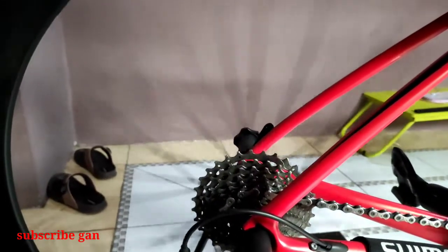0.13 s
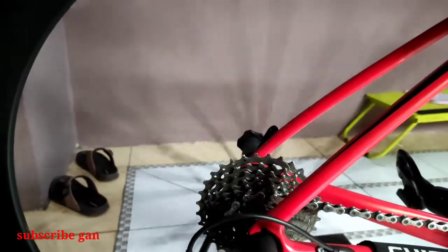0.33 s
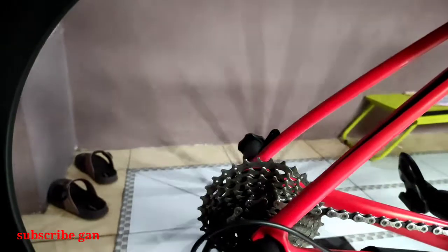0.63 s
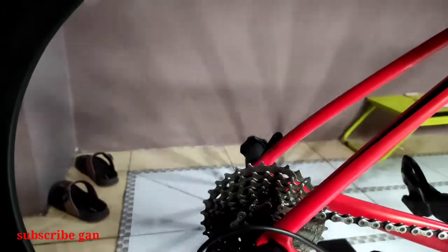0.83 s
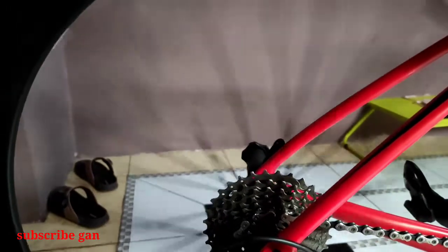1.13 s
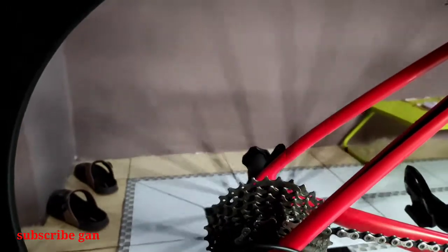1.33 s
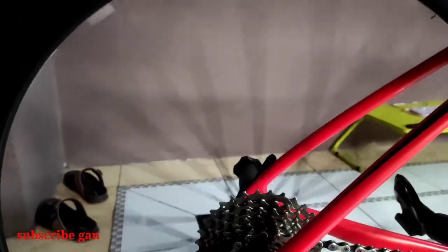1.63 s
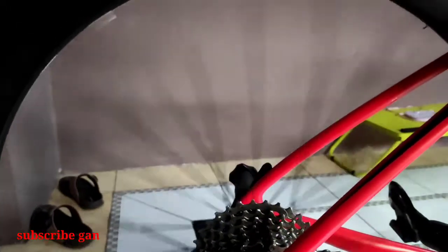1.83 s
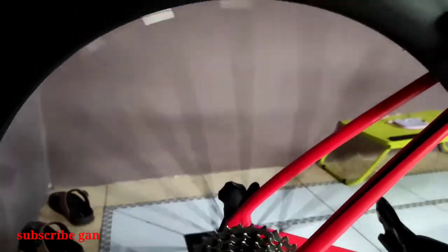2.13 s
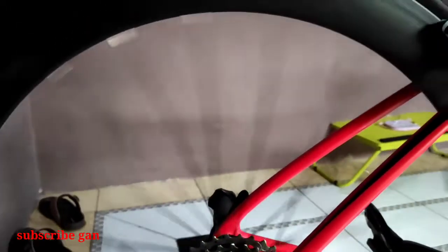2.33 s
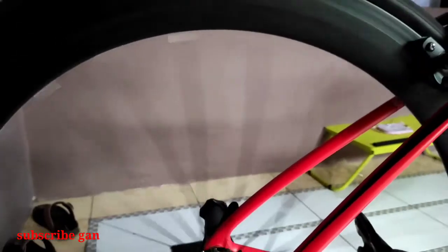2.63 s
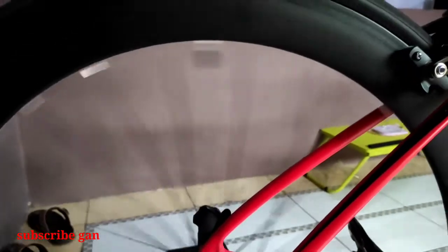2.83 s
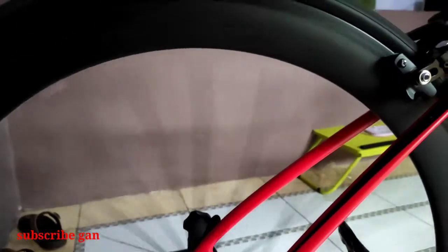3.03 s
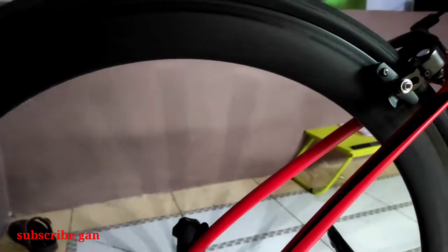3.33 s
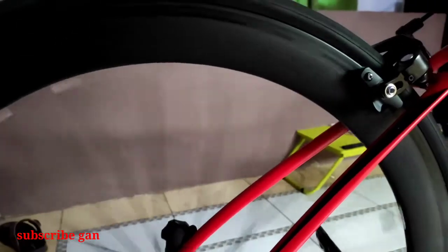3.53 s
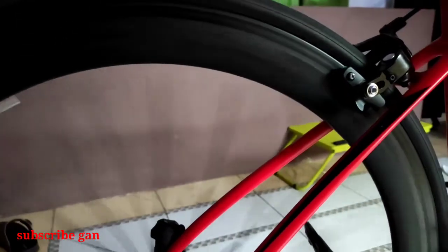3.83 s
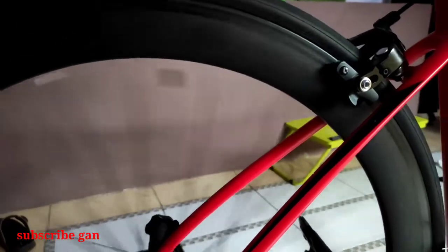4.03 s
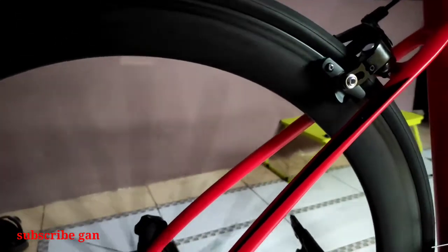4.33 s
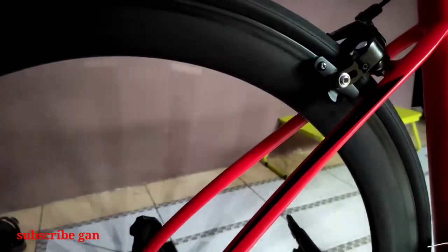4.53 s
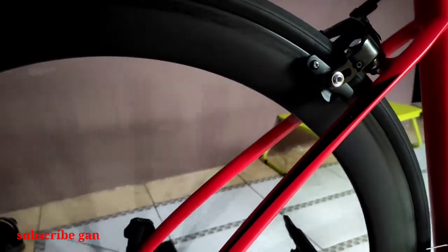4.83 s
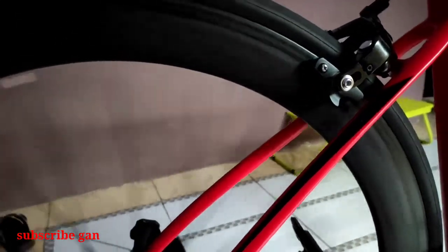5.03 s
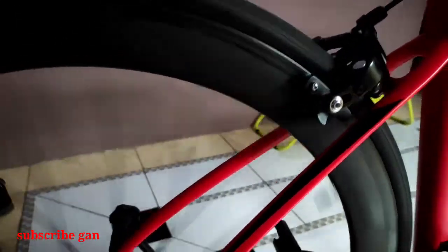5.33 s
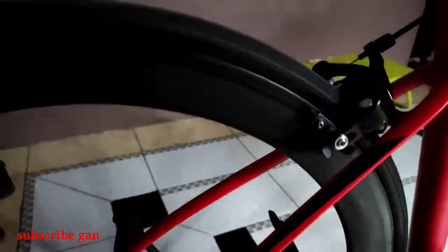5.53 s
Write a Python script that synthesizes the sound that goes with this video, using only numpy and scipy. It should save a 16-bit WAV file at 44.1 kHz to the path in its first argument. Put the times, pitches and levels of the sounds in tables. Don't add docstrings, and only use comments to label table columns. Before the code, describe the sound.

A bicycle's rear freehub clicks in a fast, loud, bright metallic ratchet buzz, slowing slightly as the wheel coasts in a tiled room.

```python
import sys
import numpy as np
from scipy import signal
from scipy.fft import rfft, irfft
from scipy.io import wavfile
from scipy.ndimage import uniform_filter1d

SR = 44100
rng = np.random.default_rng(int(sys.argv[2]) if len(sys.argv) > 2 else 0)


def persist_wave(psi):
    counts = np.round(np.clip(psi, -1, 1) * 32767).astype(np.int16)
    wavfile.write(sys.argv[1], SR, np.atleast_2d(counts).T)


def ratio(d):
    e = np.asarray(d, float) / 20
    return 10 ** e


N = 250091
LEAD = 4410
TEETH_PER_TURN = 24
LEFT_RIGHT_HALVES = np.array([[.5], [-.5]])

# low edge in Hz, high edge in Hz, snap t60 in s,
# rattle level in dB, rattle t60 in s, room level in dB, room t60 in s.
WHEEL_PARTS = [
    (1050, 3070, 0.0039, -10, 0.1, -27, 1),
    (2530, 3800, 0.009, -13.5, 0.21, -18, 0.33),
    (3090, 6220, 0.0048, -8.5, 0.078, -21.5, 0.46),
    (5460, 11160, 0.0052, -10.5, 0.029, -22, 0.46),
    (11400, 20100, 0.0062, -11, 0.071, -28, 0.12),
]


def rms_one(x):
    return x / np.sqrt(np.mean(x ** 2) + 1e-20)


def in_time(rows):
    s, *columns = np.transpose(rows)
    return [np.interp(np.arange(N) / SR, s, column) for column in columns]


def band(x, low_hz, high_hz):
    return signal.sosfilt(signal.butter(2, [low_hz, high_hz], "band", fs=SR, output="sos"), x)


def colour(x, hz, level_db):
    size = 8192
    grid_hz = np.maximum(np.arange(size // 2 + 1) * SR / size, 1)
    log_gain = np.interp(np.log(grid_hz), np.log(hz), level_db) * np.log(10) / 20
    cepstrum = irfft(log_gain)
    cepstrum[1:size // 2] *= 2
    cepstrum[size // 2 + 1:] = 0
    response = irfft(np.exp(rfft(cepstrum)))
    return signal.fftconvolve(x, response)[:N]


def dying(x, t60):
    return signal.lfilter([1], [1, -ratio(-60 / (t60 * SR))], x + 1e-18)


def impulses(s, sizes):
    at = np.clip(np.round(np.ravel(s) * SR).astype(int) + LEAD, 0, N + LEAD - 1)
    return np.bincount(at, np.ravel(sizes), N + LEAD)


def wide(mid, side, side_db, left_db):
    return (mid + ratio(side_db) * side * [[1], [-1]]) * ratio(left_db * LEFT_RIGHT_HALVES)


def teeth():
    # strength in dB, lateness in ms.
    ring = [(0.2, 0.12), (0, 0.44), (0.2, 0.31), (-3.3, 0.5), (-0.1, -0.019), (-2, 0.0054), (-1.1, 0.34),
            (-0.9, -0.18), (-1.2, 0.059), (-1.6, -0.16), (-1.5, -0.5), (-1.64, 0.04), (-0.15, -0.098),
            (-0.9, -0.19), (-3, -0.5), (-1.2, -0.8), (0.34, -0.15), (-0.3, -0.69), (-2.3, -0.46),
            (0, -0.14), (-2, 0.064), (-1.25, 0.52), (-0.26, 0.42), (0.1, -0.46)]
    # time in seconds, extra level in dB, lateness in ms.
    odd_teeth = [(0.032, -4, -2), (0.197, 2.2, 1), (0.221, 9, 0.2), (0.268, 0.5, -0.5), (0.386, -2.3, 1),
                 (0.6, -1, 1.2), (0.743, -1, 0.5), (0.886, -4, -1), (1.173, 1.2, 4), (1.197, 9, 10),
                 (1.221, 18, 9), (1.245, 0.5, -1.8), (1.317, -0.5, 1.8), (1.437, 6, 6), (1.558, -1, 0),
                 (1.824, -0.5, 0.2), (1.848, 0.2, 0.5), (1.872, -1.5, -1.3), (1.97, 2.8, -0.5),
                 (1.994, 1, -0.5), (2.115, 0, 3), (2.164, 3, 0), (2.678, 3, 3), (2.825, -1, -0.2),
                 (3.047, -0.5, -0.5), (3.494, 2, -0.2), (4.75, 2.5, 1), (4.801, 0.5, 0.6), (4.979, 1.5, 3),
                 (5.517, -1.6, 0.2)]
    # time in seconds, peak level in dB.
    slams = [(0.2194, -7), (0.6469, -7), (0.9083, -5), (1.0774, -6.5), (1.1009, -5.5), (1.1488, -3),
             (1.1962, -7), (1.2206, -6.5), (1.3882, -5.5), (1.4361, -4.5), (1.727, -2.5), (1.7509, -7.5),
             (2.0173, -2.5), (2.0657, -6.5), (2.2608, -7), (2.6279, -6), (2.8494, -8), (3.022, -8.5),
             (3.1951, -6.5), (3.2191, -8), (3.4186, -3.5), (3.6671, -7), (3.8417, -7.5), (4.0178, -6.5),
             (4.6488, -5.5), (5.2335, -7.5)]
    first_tooth_s = .0083
    gap_s, gap_growth_s, growth_gain_s = .0235557, 8.538e-6, 9.39e-9
    tooth_level_db, fade_db_per_s, swing = -9.8, -0.27, 1.02
    scatter_db, jitter_ms = 0.33, 0.22
    slam_db, slam_spread, slam_early_ms = 6.5, .5, 0.35

    k = np.arange(-3, 231)
    s = first_tooth_s + gap_s * k + gap_growth_s * k ** 2 / 2 + growth_gain_s * k ** 3 / 6
    extra_db, late_ms = np.array(ring)[np.arange(len(k)) % TEETH_PER_TURN].T
    stray = rng.standard_normal((len(k), 2)) * [scatter_db, jitter_ms]
    spread = np.ones(len(k))
    for at, odd_db, odd_ms in odd_teeth:
        stray[np.argmin(np.abs(s - at))] = odd_db, odd_ms
    s = s + (late_ms + stray[:, 1]) / 1000
    for at, peak_db in slams:
        near = np.argmin(np.abs(s - at))
        s[near] = at - slam_early_ms / 1000
        stray[near, 0] = peak_db + slam_db
        spread[near] = slam_spread
    tooth_db = tooth_level_db + fade_db_per_s * s + swing * (extra_db + stray[:, 0])
    return s, tooth_db, spread


def pawls(s, tooth_db, spread, scatter_db, part_db):
    # lag as a share of the spread, lag scatter as a share of the spread, level in dB.
    pawl_rows = [
        (-.3, 0.081, 0),
        (.1, 0.084, -5.5),
        (0.449, .15, 1.5),
        (.8, 0.21, -2),
        (1.8, 0.47, -10.5),
        (3.5, 1.5, -10),
    ]
    lag, lag_scatter, pawl_db = np.transpose(pawl_rows)
    looseness_db = rng.standard_normal(len(s)) - 0.85 * (tooth_db - tooth_db.mean())
    spread_ms = spread * 2.2 * ratio(np.minimum(looseness_db, 1.2))

    streams = 2 * len(WHEEL_PARTS)
    chance = rng.standard_normal((len(s), 2 + streams, len(lag)))
    when = s[:, None] + spread_ms[:, None] / 1000 * (lag + lag_scatter * chance[:, 0])
    energy = ratio(pawl_db + scatter_db * chance[:, 1]) ** 2
    energy = energy / energy.sum(axis=1, keepdims=True) * ratio(tooth_db[:, None]) ** 2
    blows = [impulses(when, energy * ratio(part_db * chance[:, 2 + k]) ** 2) for k in range(streams)]
    return np.reshape(blows, (len(WHEEL_PARTS), 2, -1))


def hub(s, tooth_db, spread, rim_db, tail_db):
    out = 0
    white = rng.choice([-1., 1.], (2, 2, N))
    tail_power = np.pad(ratio(2 * tail_db), (LEAD, 0), "edge")
    part_blows = pawls(s, tooth_db, spread, scatter_db=5.0, part_db=1.9)
    for k, (blows, part) in enumerate(zip(part_blows, WHEEL_PARTS)):
        low_hz, high_hz, snap_t60, rattle_db, rattle_t60, room_db, room_t60 = part
        late = dying(blows, 0.0072) / 40 * tail_power
        snap = dying(uniform_filter1d(blows, size=30), snap_t60 / 2)
        rattle = ratio(2 * rattle_db) * dying(late, rattle_t60 / 2)
        room = ratio(2 * room_db) * dying(late, room_t60 / 2)
        power = snap + rattle + room
        sound = band(np.sqrt(power[:, LEAD:]) * white[k % 2], low_hz, high_hz)
        out = out + ratio(rim_db * (k == 0)) * sound
    return out


def turned(x, s):
    patch_db, broad_kept = 4, 0.62
    hz, t, z = signal.stft(x, SR, nperseg=256)
    tooth = np.searchsorted(s - .003, t)
    fine = uniform_filter1d(rng.standard_normal((len(s) + 1, 3, len(hz))), size=2)
    fine = fine - (1 - broad_kept) * uniform_filter1d(fine, size=11)
    shared, left, right = fine.T.swapaxes(0, 1)
    depth_db = patch_db * np.clip(hz / 4000, .7, 1)[:, None]
    patch = ratio(depth_db * np.array([shared + left, shared + right]))
    usual = np.mean(np.abs(z) ** 2, axis=2, keepdims=True)
    patched = uniform_filter1d(usual * patch ** 2, size=15, axis=1)
    patch = patch / np.sqrt(patched / uniform_filter1d(usual, size=15, axis=1))
    return signal.istft(z * patch[:, :, tooth], SR, nperseg=256)[1][:, :N]


def ratchet(s, tooth_db, spread):
    # left level in dB, right level in dB.
    port_colour = [(-75, -72), (-60.5, -57), (-50, -50.5), (-56.5, -56.5), (-46.5, -45), (-60.5, -55),
                   (-58.5, -61.5), (-55.5, -51), (-49, -36), (-36.5, -47), (-56.5, -55.5), (-53.5, -59.5),
                   (-51, -47), (-57.5, -55.5)]
    port_hz = [1300, 1900, 2800, 3380, 4100, 4750, 5800, 6900, 7750, 8700, 10300, 11600, 12250, 13600]
    # time in seconds, hub level in dB, left minus right in dB, lowest band of the rim in dB,
    # rattle and echoes in dB.
    drift = [
        (0, 0, -1, -1.5, 0),
        (1.0, 0.5, 0.5, -0.5, -1.3),
        (2, 0, 0.5, -1.5, -1.05),
        (3, 0.5, 2, 0.5, -0.6),
        (4.5, 1, 2, 1, -0.4),
        (5.67, 2, 0.2, -0.4, 0.1),
    ]
    left_db, right_db = np.transpose(port_colour)
    level_db, lean_db, rim_db, tail_db = in_time(drift)
    left, right = hub(s, tooth_db, spread, rim_db, tail_db)
    coloured = np.array([colour(left, port_hz, left_db), colour(right, port_hz, right_db)])
    return rms_one(turned(coloured, s)) * ratio(-19.5 + level_db + lean_db * LEFT_RIGHT_HALVES)


def spokes(s, level_db):
    # frequency in Hz, level in dB, t60 in s,
    # tooth of the turn where it changes, extra level there in dB.
    rings = [(729, -13.5, 0.16, 14, 5), (863, -7.5, 0.13, 22.2, 12.5), (911, -10, 0.34, 11.4, 2.5),
             (950, -4.5, 0.15, 16.3, -4), (1015, -13.5, 0.18, 0.99, 14), (1076, -9.5, 0.19, 46, -1),
             (1236, -10.5, 0.18, 3.3, 1), (1518, -6, 0.14, 10.2, 10.5), (1977, 3, 0.11, 5.4, 6)]
    out = 0
    place = np.arange(len(s)) % TEETH_PER_TURN
    for hz, mode_db, t60, tooth, extra_db in rings:
        r, w = ratio(-60 / (t60 * SR)), 2 * np.pi * hz / SR
        singing = ratio(extra_db * np.exp(-((place - tooth) / 1.44) ** 2))
        common, left, right = rng.standard_normal((len(s), 3)).T * singing
        plucks = np.array([impulses(s, 1.17 * common + left), impulses(s, 0.28 * common + right)])
        plucks = uniform_filter1d(plucks, size=12)
        ringing = signal.lfilter([0, np.sin(w)], [1, -2 * r * np.cos(w), r * r], plucks + 1e-18)
        out = out + ratio(mode_db + level_db) * ringing
    return out[:, LEAD:]


def swells(rows, idle_db):
    swell_s = .04
    start, length, *level_db = np.transpose(rows)
    t = np.arange(0, N + 100, 100)[:, None] / SR
    inside_s = np.minimum(t - start, start + length - t)
    shape = np.clip(inside_s / swell_s + .5, 0, 1) ** 2
    power = shape ** 2 @ ratio(2 * np.transpose(level_db)) + ratio(2 * np.array(idle_db))
    return [np.interp(np.arange(N) / SR, t[:, 0], np.sqrt(p)) for p in power.T]


def rumble(gains):
    # time in seconds, rate in Hz.
    firing = [
        (0, 80.8),
        (.5, 78.73),
        (1.05, 76.6),
        (1.65, 73.77),
        (2.35, 67.73),
        (2.9, 64.3),
        (3.5, 60.85),
        (3.9, 78.7),
        (5.67, 78.9),
    ]
    orders = [(1, 0), (2, 0), (3, 1), (4, 2), (5, 2)]
    order_levels = [-12.5, -1.5, -3, -2, -6]
    waver_hz = 3.5
    turns = np.cumsum(in_time(firing)[0]) / SR
    out, r = 0, np.exp(-np.pi * waver_hz / SR)
    for (multiple, column), level_db in zip(orders, order_levels):
        noise = rng.standard_normal((2, N + LEAD)) + 1j * rng.standard_normal((2, N + LEAD))
        waver = signal.lfilter([1], [1, -2 * r ** multiple, r ** (2 * multiple)], noise)[:, LEAD:]
        waver = waver / np.sqrt(np.mean(np.abs(waver) ** 2))
        steadied = 1.13 * waver / (np.abs(waver) + 0.32)
        mid, side = np.real(steadied * np.exp(2j * np.pi * multiple * turns))
        out = out + ratio(level_db) * gains[column] * wide(mid, side, side_db=-42, left_db=5.0)
    return out


def room_and_street(thud, murmur):
    # frequency in Hz, level in dB per Hz.
    air_colour = [(12, -50), (20, -15), (55, -7.5), (87, -1.5), (124, -11.5), (160, -4.5), (183, -8),
                  (319, -7), (414, -13.5), (635, -10), (871, -8), (1130, -10), (1700, -8), (2210, -4),
                  (3740, -120)]
    hz, level_db = np.transpose(air_colour)
    mid, side = (rms_one(colour(n, hz, level_db)) for n in rng.standard_normal((2, N)))
    out = ratio(-48.5) * wide(mid, side, side_db=-7, left_db=3.0)
    for low_hz, high_hz, gain in [(20, 32, thud), (260, 476, murmur)]:
        mid, side = rms_one(band(rng.standard_normal((2, N)), low_hz, high_hz))
        out = out + ratio(-7.5) * gain * wide(mid, side, side_db=-3.5, left_db=4.0)
    return out


def background():
    # start in seconds, length in seconds, first and second order in dB, third order in dB, higher
    # orders and murmur in dB.
    engine_swells = [(-.03, 0.18, -52, -42, -54), (.13, .15, -40.5, -45, -46.5),
                     (.29, 0.304, -42.5, -48, -51), (.62, 0.19, -46, -44, -48),
                     (.8, 0.22, -50, -45.5, -48.5), (.95, 0.23, -48, -36.5, -52.5),
                     (1.14, 0.23, -47, -49.5, -53), (1.41, 0.081, -43, -45, -55),
                     (1.56, 0.17, -50, -45.5, -49), (1.72, 0.526, -64, -50.5, -55),
                     (2.26, 0.18, -63, -48, -56.5), (2.42, 0.29, -54, -52.5, -51),
                     (2.77, 0.24, -60, -54, -49), (3.17, 0.074, -59, -53, -52),
                     (4.12, 0.25, -53, -73, -60.5), (4.36, 0.35, -48.5, -68, -63),
                     (4.7, 0.049, -63, -48, -64), (5.12, 0.097, -53, -51, -65)]
    engine_idle = (-60.5, -62, -70)
    # start in seconds, length in seconds, level in dB.
    thuds = [(0.07, 0.25, -49), (0.42, 0.084, -56), (3.378, 0.046, -124), (4.096, 0.032, -80),
             (4.56, 0.054, -68), (4.798, 0.047, -85), (5.037, 0.0325, -77), (5.135, 0.052, -42),
             (5.416, 0.11, -61)]
    lower, upper, murmur = swells(engine_swells, engine_idle)
    thud, = swells(thuds, [-55])
    return rumble([lower, upper, murmur]) + room_and_street(thud, murmur)


def scene():
    s, tooth_db, spread = teeth()
    return ratchet(s, tooth_db, spread) + spokes(s, level_db=-44) + background()


def thin_treble(x):
    mask_spread_hz, mask_db, waver_db, top_hz = 3400, -12.5, 5.0, 15400
    hz, _, z = signal.stft(x, SR, "cosine", nperseg=1024, noverlap=512)
    power = np.abs(z[:, :512]) ** 2
    bands = power.reshape(2, 64, 8, -1).mean(axis=(0, 2))
    centre = hz[:512].reshape(64, 8).mean(axis=1)[:, None]
    spread = np.exp(-np.abs(centre - centre.T) / mask_spread_hz)
    mask = (spread / spread.sum(axis=1, keepdims=True)) @ bands * (centre > 1900)
    mask = mask * ratio(2 * 8 * np.clip((centre - 13300) / 2300, 0, 1))
    waver = uniform_filter1d(rng.standard_normal(bands.shape), size=3)
    mask = mask * ratio(2 * (mask_db + waver_db * waver))
    band_heard = np.repeat(bands > mask, 8, axis=0)
    line_heard = power > .8 * np.repeat(mask, 8, axis=0)
    z[:, :512] *= band_heard * line_heard
    z *= np.clip((top_hz + 600 - hz[:, None]) / 600, 0, 1) ** 2
    return signal.istft(z, SR, "cosine", nperseg=1024, noverlap=512)[1][:, :N]


def top_cut(x):
    return signal.sosfilt(signal.butter(12, 16840, fs=SR, output="sos"), x)


def record(dry):
    rounded = 1.085 * np.tanh(dry / 1.09)
    mix = thin_treble(rounded)
    return top_cut(mix)


dry = scene()
out = record(dry)
persist_wave(out)
```